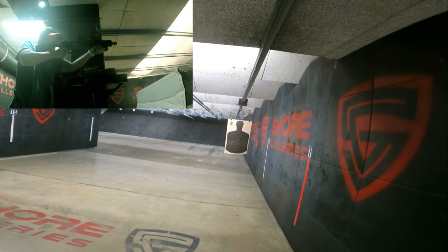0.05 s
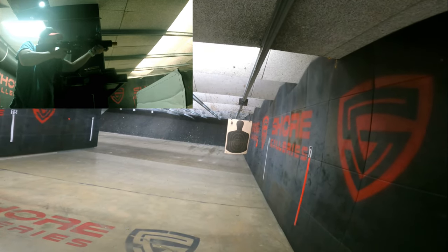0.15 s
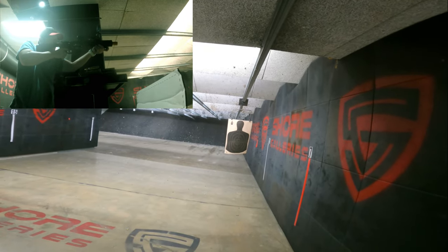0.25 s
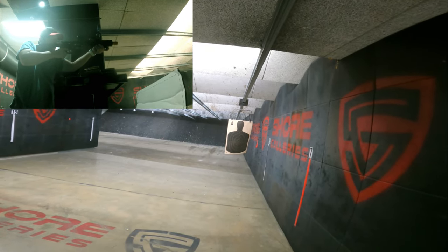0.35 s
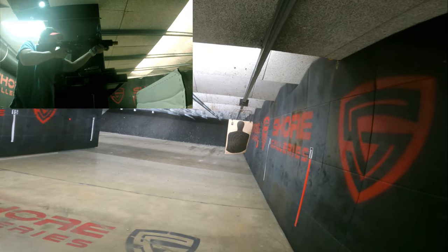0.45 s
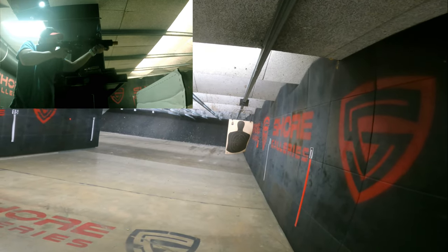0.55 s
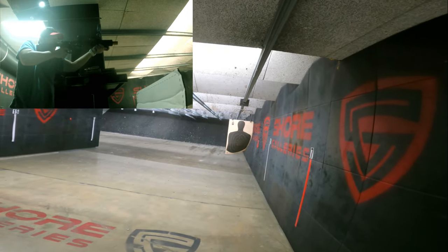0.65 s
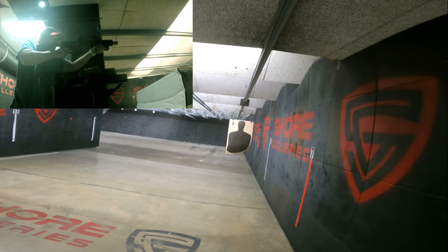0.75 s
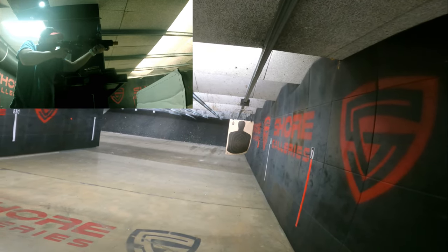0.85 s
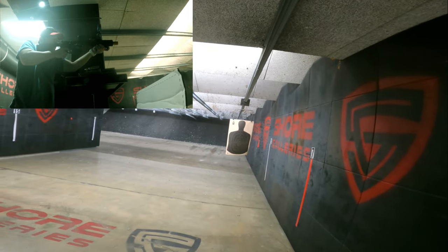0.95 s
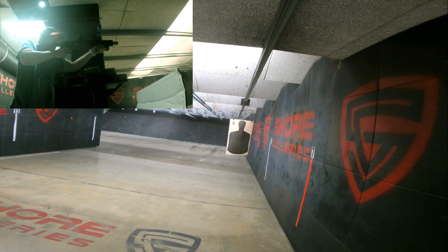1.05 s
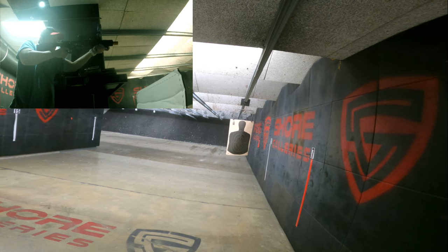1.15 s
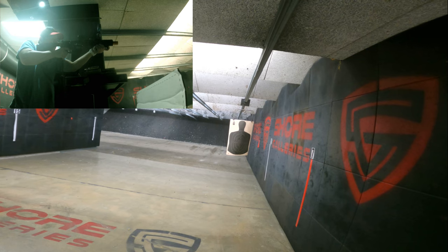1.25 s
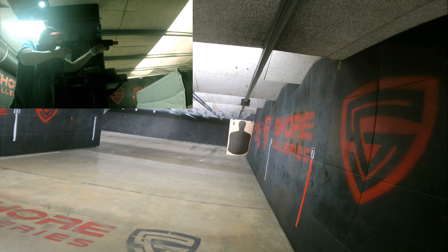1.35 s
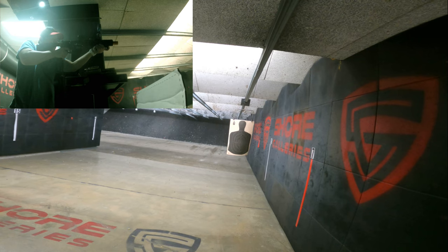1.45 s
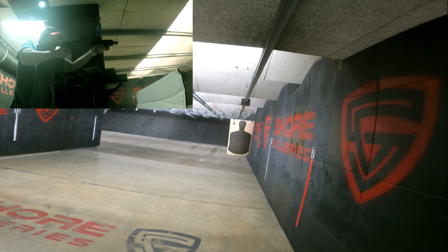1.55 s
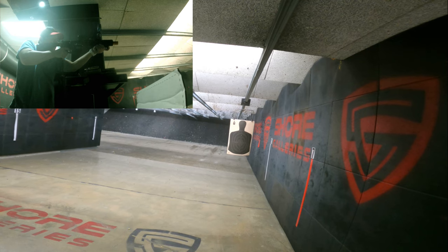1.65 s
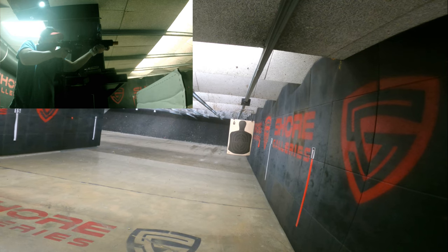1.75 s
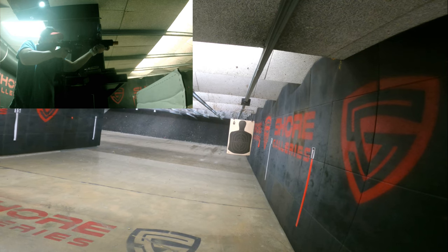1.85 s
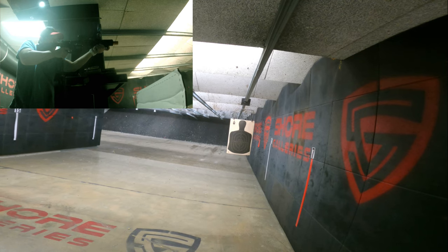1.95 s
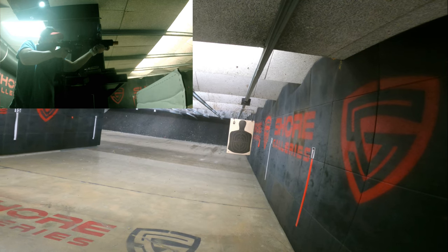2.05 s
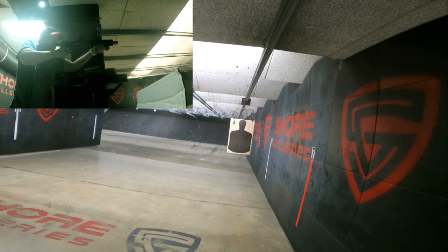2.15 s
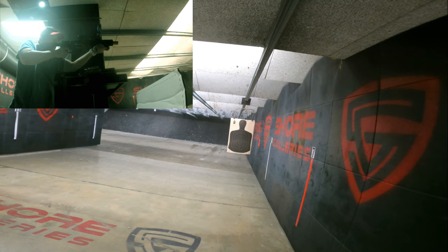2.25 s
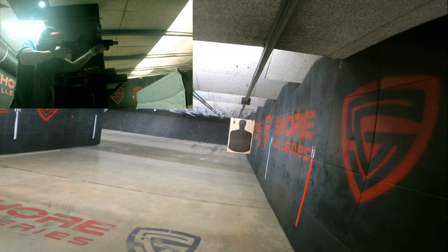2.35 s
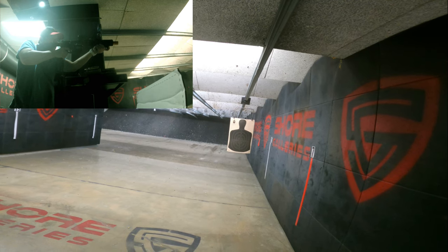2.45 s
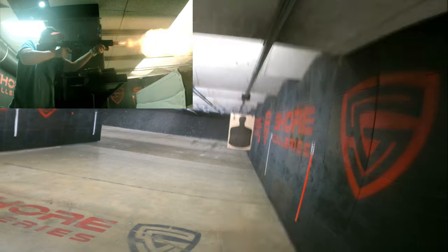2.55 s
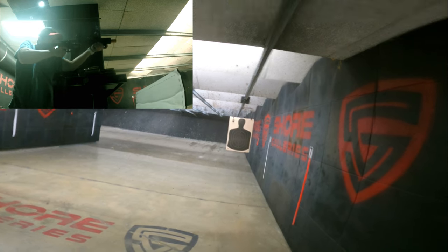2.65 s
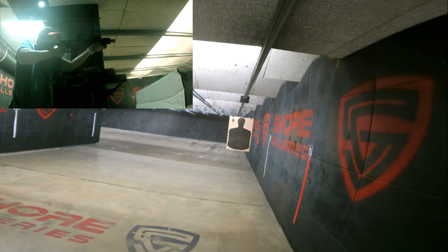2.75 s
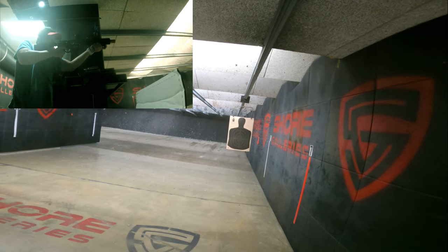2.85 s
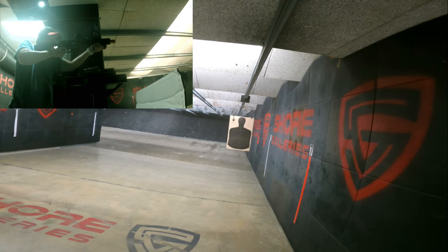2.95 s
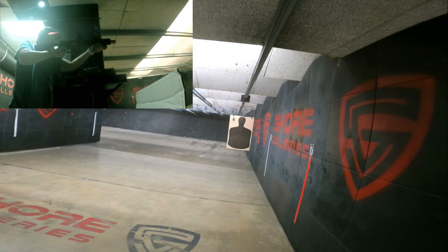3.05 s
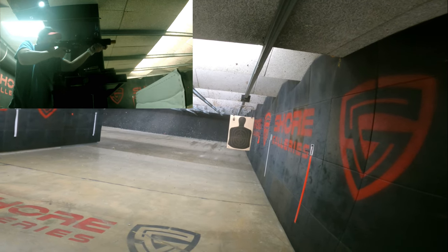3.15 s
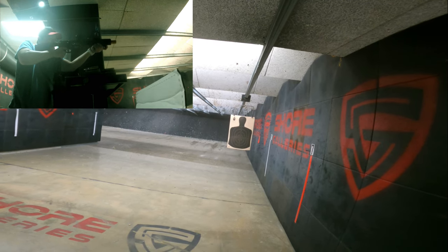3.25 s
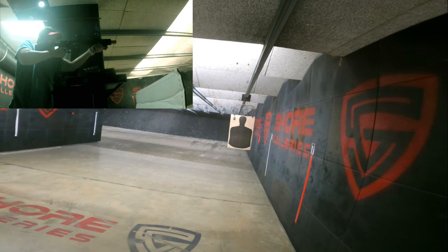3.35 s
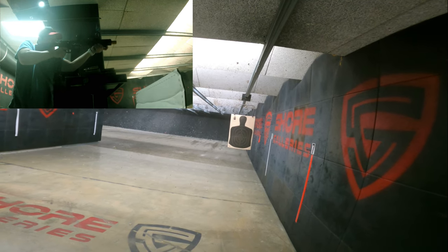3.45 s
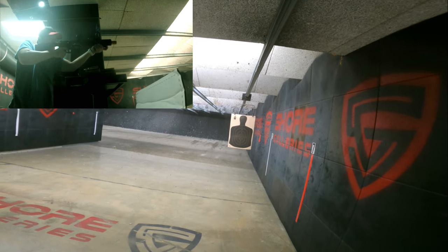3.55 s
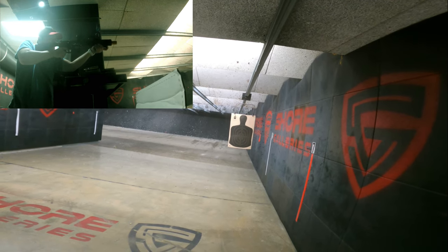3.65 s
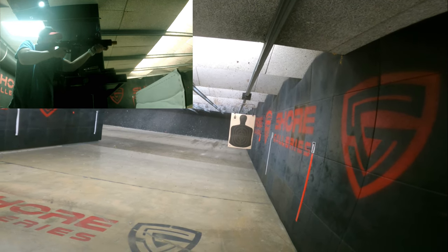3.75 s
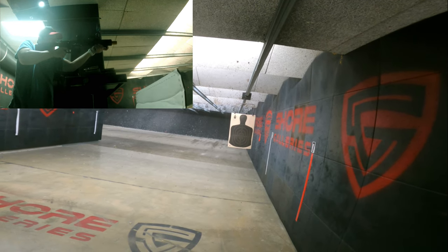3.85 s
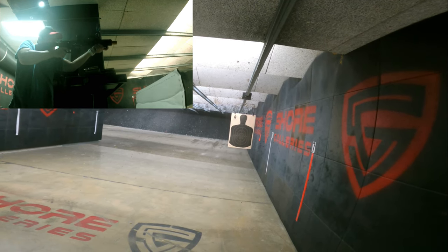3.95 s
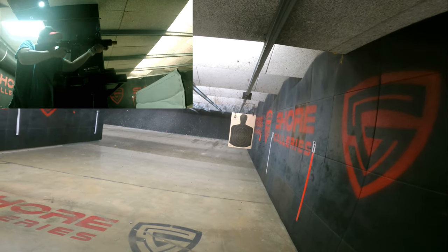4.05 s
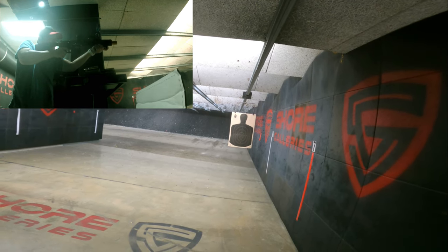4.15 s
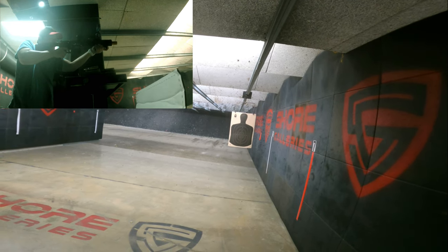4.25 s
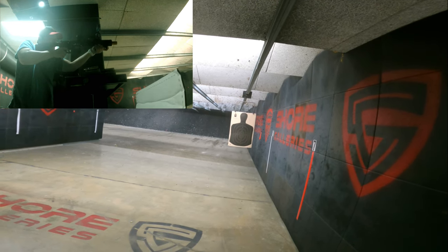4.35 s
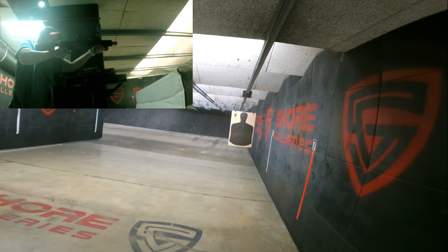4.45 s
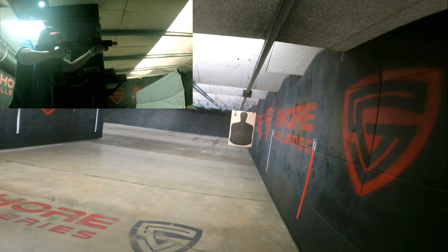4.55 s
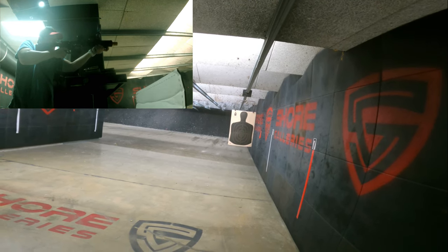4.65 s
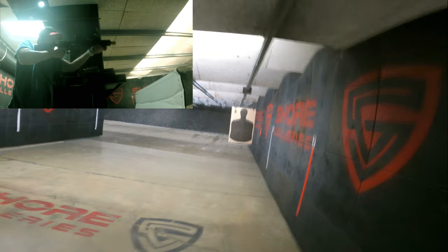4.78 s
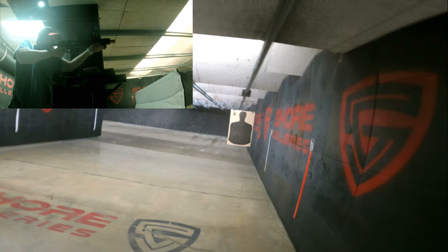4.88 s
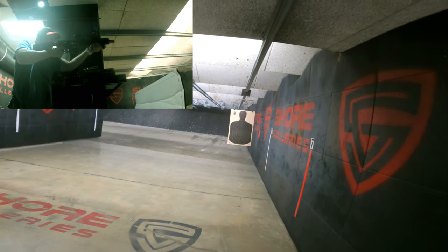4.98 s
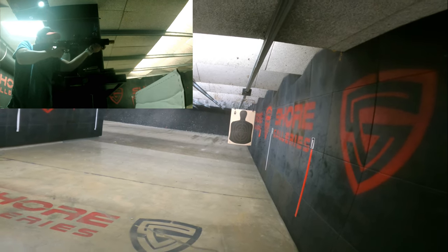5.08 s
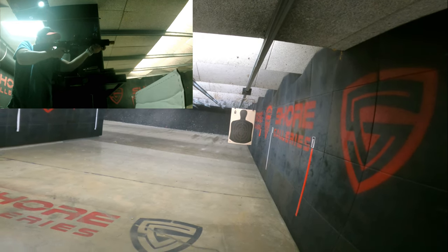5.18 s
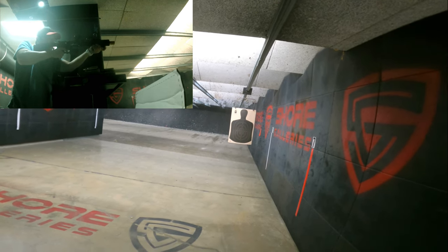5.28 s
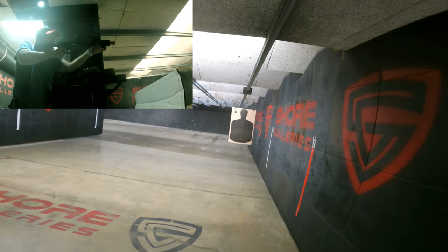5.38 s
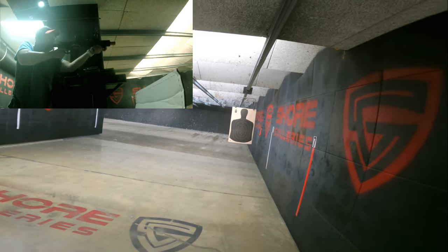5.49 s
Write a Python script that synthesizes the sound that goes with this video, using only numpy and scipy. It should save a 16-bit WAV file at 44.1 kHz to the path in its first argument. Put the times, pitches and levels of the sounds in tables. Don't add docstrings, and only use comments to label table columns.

```python
import sys
import numpy as np
from scipy import signal
from scipy.io import wavfile
from scipy.ndimage import uniform_filter1d

SR = 44100
rng = np.random.default_rng(int(sys.argv[2]) if len(sys.argv) > 2 else 0)


def generate_wav(sig):
    pcm = np.round(np.clip(np.atleast_2d(sig).T, -1, 1) * 32767).astype(np.int16)
    wavfile.write(sys.argv[1], SR, pcm)


def voltage_ratio(decibels):
    exponent = np.asarray(decibels, float) / 20
    return 10 ** exponent


N = 243431
TIME = np.arange(N) / SR
BOOM_LAG_S, SIDE_LAG_S = 0.035, 0.1702


def at_hz(table, hz):
    table_hz, *columns = np.transpose(table)
    return [np.interp(np.log(hz), np.log(table_hz), column) for column in columns]


def dying(start, t60, rise):
    span = slice(max(int(start * SR), 0), int((start + 2 * t60) * SR) + 2)
    age = np.maximum(TIME[span] - start, 0)
    build_up = 1 - np.exp(-age / max(rise, 1e-4))
    out = np.zeros(N)
    out[span] = build_up * np.exp(-np.log(1000) * age / t60)
    return out


def ramp_into(start, seconds, bend):
    span = slice(max(int((start - seconds) * SR), 0), max(int(start * SR), 0))
    out = np.zeros(N)
    out[span] = np.clip((TIME[span] - start) / seconds + 1, 0, 1) ** bend
    return out


def filtered(x, order, hz, kind):
    return signal.sosfilt(signal.butter(order, hz, kind, fs=SR, output="sos"), x)


def bands(low, high, channels):
    settle = 4000
    white = rng.standard_normal((2, channels, N + settle)) * np.sqrt(SR / 2)
    edges = np.geomspace(low, high, round(2.5 * np.log2(high / low)) + 1)
    for k, (a, b) in enumerate(zip(edges, edges[1:])):
        yield np.sqrt(a * b), filtered(white[k % 2], 3, [a, b], "band")[:, settle:]


def narrow_noise(hz, width_hz):
    r = np.exp(-np.pi * width_hz / SR)
    poles = [1, -2 * r * np.cos(2 * np.pi * hz / SR), r * r]
    x = signal.lfilter([1, 0, -1], poles, rng.standard_normal(N + SR))[SR:]
    return x / x.std()


def loudness(x, seconds):
    power = uniform_filter1d(x ** 2, size=int(seconds * SR))
    return np.sqrt(np.maximum(power, 0) + 1e-16)


# (time [s], blast level [dB], boom level [dB], rattle level [dB], side recorder level [dB])
SHOT_EVENTS = [
    (-.569, 18.5, 3, 4, 8),
    (2.4564, 10, 1, -10.5, 0),
    (4.682, 9, -3.5, -5.5, 0.3),
]
# (frequency [Hz], level [dB per Hz], t60 [s], build-up [s])
BLAST_BANDS = [(50, 8.5, 1.27, 0.3), (148.8, 11, 0.91, 0.059), (273, 5, 1.01, 0.067),
               (464, 12, 0.88, 0.035), (864, 5.5, 0.93, 0.0089), (1400, -7, 0.97, 0.00069),
               (2260, -12, 1.086, 0.0032), (4070, -15, 0.86, 0.0023)]
# (frequency [Hz], level [dB per Hz])
RIFLE_AIR = [(45, -44), (90, -51), (140, -66), (280, -60), (500, -68.5), (1200, -73), (2000, -103.5),
             (4400, -125.5)]


def hall():
    out = np.zeros(N)
    for hz, noise in bands(40, 4600, channels=1):
        level_db, t60, rise = at_hz(BLAST_BANDS, hz)
        tail = sum(voltage_ratio(blast_db + level_db - 24.5) * dying(s, t60, rise) for s, blast_db, *_ in SHOT_EVENTS)
        air = voltage_ratio(at_hz(RIFLE_AIR, hz)[0])
        out += noise[0] * np.hypot(tail, air)
    return out


# (frequency [Hz], level [dB per Hz], t60 [s], left-right likeness [0-1], left minus right [dB])
SIDE_BLAST_BANDS = [(297, -22, 0.46, 0.93, -1), (900, -25.5, 0.69, 0.93, 4), (2670, -43, 1, 0.97, 1),
                    (4950, -44.5, 0.73, 0.62, 0.5), (7100, -49, 0.64, 0.71, 1.5),
                    (8800, -56.5, 0.55, 0.33, 3), (12100, -68, 0.63, .45, 2), (15500, -72.5, .42, .45, 4)]
# (frequency [Hz], level [dB per Hz])
SIDE_AIR_BANDS = [(300, -89.5), (1000, -87.5), (2400, -90), (3400, -101), (4500, -111), (7000, -121),
                  (9000, -143), (15500, -149)]


def side_recorder():
    heard = [(s + SIDE_LAG_S, side_db) for s, *_, side_db in SHOT_EVENTS]
    squeeze = 0
    for s, _ in heard:
        squeeze = squeeze + voltage_ratio(24.5) * dying(s, 0.81, 0.00051) + voltage_ratio(7.5) * dying(s, 7.3, 0.05)
    out = np.zeros((2, N))
    for hz, (mid, side) in bands(250, 16000, channels=2):
        level_db, t60, alike, lean_db = at_hz(SIDE_BLAST_BANDS, hz)
        crack_db = 19 - 10 * abs(np.log2(hz / 6800))
        tail = 0
        for s, side_db in heard:
            smear = voltage_ratio(-11.5) * ramp_into(s, 0.023, 1.2)
            crack = voltage_ratio(crack_db) * dying(s, 0.0033, 0.00076)
            tail = tail + voltage_ratio(side_db + level_db) * (smear + crack + dying(s, t60, 0.0004))
        alike = np.clip(alike, 0, 1)
        pair = np.sqrt(1 + alike) * mid + np.sqrt(1 - alike) * side * [[1], [-1]]
        lean = voltage_ratio([[lean_db / 2], [-lean_db / 2]])
        out += pair * lean * np.hypot(tail, voltage_ratio(at_hz(SIDE_AIR_BANDS, hz)[0]))
    return out / (1 + squeeze)


# (frequency [Hz], level after a shot [dB], t60 [s], width [Hz], level under the ventilation [dB])
STANDING_WAVES = [(26.347, 5, 3.02, 2.5, -37.5), (26.8, 5, 2.56, 2.2, -39), (84.8, 6, 1.7, 8.3, -42.5),
                  (100.67, 7.5, 1.18, 12, -49), (153.55, 6, 1.23, 9.3, -42.5), (304, -3.5, 1.54, 12, -52),
                  (487, -2, 0.55, 8.7, -46)]


def room_modes():
    out = np.zeros(N)
    for hz, shot_db, t60, width_hz, air_db in STANDING_WAVES:
        out += voltage_ratio(air_db) * narrow_noise(hz, width_hz)
        for s, _, boom_db, *_ in SHOT_EVENTS:
            ring = np.sin(2 * np.pi * hz * (TIME - s - BOOM_LAG_S))
            out += voltage_ratio(shot_db + boom_db) * dying(s, t60, 0.072) * ring
    return out


def rattle():
    lowest_hz, lag_s = STANDING_WAVES[0][0], 0.02
    gate = 0
    for s, _, _, rattle_db, _ in SHOT_EVENTS:
        swing = np.sin(2 * np.pi * lowest_hz * (TIME - s - BOOM_LAG_S - lag_s))
        gate = gate + voltage_ratio(rattle_db) * dying(s + 0.46, 0.61, 0.15) * (2.5 + swing) ** 2 / 7
    return voltage_ratio(-5) * gate * narrow_noise(1860, 110)


# (time [s], peak level [dB], ring [Hz], t60 [s], share of broad clatter [0-1])
HOUSING_KNOCKS = [
    (0.3288, -22.5, 1960, 0.15, 0.93),
    (.5578, -16, 2050, 0.019, 0.49),
    (.7339, -29, 2010, 0.032, .2),
    (0.8327, -27, 1980, 0.036, 0.13),
    (3.3326, -18, 1980, 0.13, 0.9),
    (3.557, -48, 1870, 0.046, 0.24),
    (3.754, -38, 1670, 0.07, 0.68),
    (5.4396, -21, 1910, 0.074, .95),
]


def knocks():
    clatter = filtered(rng.standard_normal(N), 1, [250, 3500], "band")
    out = np.zeros(N)
    for s, db, hz, t60, share in HOUSING_KNOCKS:
        ring = np.sin(2 * np.pi * hz * (TIME - s))
        out += voltage_ratio(db) * dying(s, t60, 0.0015) * ((1 - share) * ring + share * 2.0 * clatter)
    return out


# (time [s], click level [dB], flank rings level [dB], mouth ring level [dB])
CASE_BOUNCES = [(.5023, -48.5, -77, -73.5), (.7317, -53, -80, -71), (.9066, -58, -88, -84),
                (1.0074, -61, -79, -73), (1.1358, -63, -99, -95), (1.1677, -62, -95, -79),
                (1.2535, -70, -97, -96), (1.297, -61, -69.5, -87), (1.3674, -78, -75, -86),
                (3.5102, -40.5, -74, -57), (3.9185, -54, -75, -71), (4.0944, -59, -75, -70),
                (4.199, -66, -86, -82)]
# (frequency [Hz], t60 [s], level [dB], column of CASE_BOUNCES that drives it [index])
CASE_RINGS = [
    (11180, .4, 0, 2),
    (12820, .38, -6.5, 2),
    (14740, 0.29, 0, 3),
]


def cases():
    hiss = filtered(rng.standard_normal((2, N)), 2, [3500, 8500], "band")
    hiss[1] = 0.64 * hiss[0] + 0.7 * hiss[1]
    clicks = 0
    for s, click_db, *_ in CASE_BOUNCES:
        click = dying(s, 0.027, 0.00082) + voltage_ratio(-14.0) * dying(s, 0.22, 0.008)
        clicks = clicks + voltage_ratio(click_db - 1.5) * click
    out = hiss * clicks
    for hz, t60, ring_db, column in CASE_RINGS:
        rings = sum(voltage_ratio(row[column] + ring_db - 2.0) * dying(row[0], t60, 0.0018) for row in CASE_BOUNCES)
        out += narrow_noise(hz, 30) * rings
    return out * voltage_ratio([[2.1], [-2.1]])


# (time [s], peak level [dB])
FAN_SWELLS = [(.52, -14), (.70, -19), (.84, -17), (.98, -19), (1.13, -21), (1.26, -21), (1.46, -20.5),
              (1.59, -22), (1.78, -15), (1.94, -16.5), (2.02, -19.5), (2.14, -17.5), (2.36, -17),
              (3.38, -17), (3.53, -11), (3.70, -13.5), (3.90, -19.5), (4.17, -17), (4.33, -23), (4.52, -19),
              (4.66, -16.5)]


def throb():
    throb_hz, half_width_s = 26.4, 0.05
    wander = np.cumsum(narrow_noise(1.11, 2.4)) / SR
    swells = np.zeros(N)
    for k, (s, db) in enumerate(FAN_SWELLS):
        swells += (-1) ** k * voltage_ratio(db) * np.exp(-0.5 * ((TIME - s) / half_width_s) ** 2)
    return swells * np.sin(2 * np.pi * (throb_hz * TIME + 2.64 * wander))


# (low edge [Hz], high edge [Hz], threshold [dB])
WEAK_BANDS = [(2090, 2900, -35), (2700, 3500, -32), (3416, 4000, -31.5), (3820, 4800, -36)]


def rifle_recorder(x):
    ceiling, knee = 0.69, 5.7
    x = x / (1 + np.abs(x / ceiling) ** knee) ** (1 / knee)

    ahead = sum(ramp_into(shot[0], 0.027, 0.79) for shot in SHOT_EVENTS)
    follow = loudness(filtered(x, 2, 400, "high"), 0.025) * (ahead == 0)
    grit = filtered(rng.standard_normal(N), 2, 400, "high")
    x = x + (voltage_ratio(-12.0) * ahead + voltage_ratio(-5.5) * follow) * grit

    for low, high, threshold_db in WEAK_BANDS:
        band = signal.sosfiltfilt(signal.butter(2, [low, high], "band", fs=SR, output="sos"), x)
        x = x - band / (1 + (loudness(band, 0.03) / voltage_ratio(threshold_db)) ** 1.7)

    edge = signal.sosfiltfilt(signal.cheby2(10, 30, 3520, "high", fs=SR, output="sos"), x)
    flicker_db = np.minimum(-12 + 4.5 * rng.standard_normal(400), 0)
    flicker = voltage_ratio(flicker_db)[(TIME / 0.023).astype(int)]
    x = x - edge * (1 - uniform_filter1d(flicker, size=300))

    starved = uniform_filter1d(1.0 * (TIME > 2.35) * (TIME < 2.435), size=300)
    treble = signal.sosfiltfilt(signal.butter(3, 750, "high", fs=SR, output="sos"), x)
    x = x - starved * (1 - voltage_ratio(-17)) * treble
    return signal.sosfiltfilt(signal.cheby2(16, 45, 3983 * 1.115, fs=SR, output="sos"), x)


def scene():
    at_rifle = hall() + room_modes() + throb() + rattle() + knocks()
    return rifle_recorder(at_rifle) + side_recorder() + cases()


def low_pass(x):
    return signal.sosfilt(signal.butter(12, 15900, fs=SR, output="sos"), x)


def record(dry):
    mix = np.clip(dry, -1, 1)
    return low_pass(mix)


dry = scene()
out = record(dry)
generate_wav(out)
```